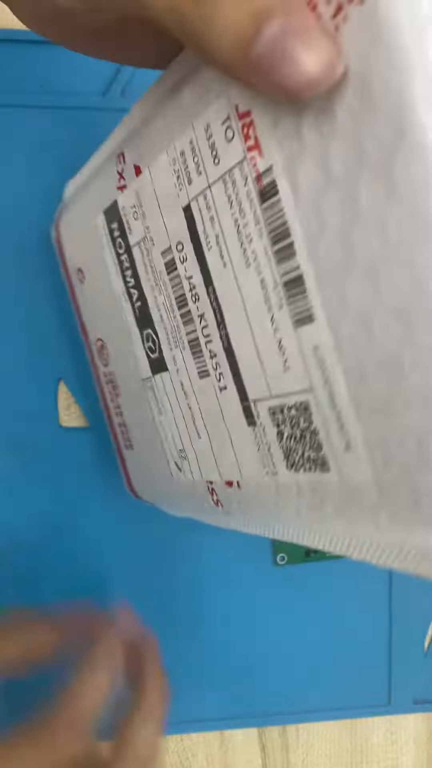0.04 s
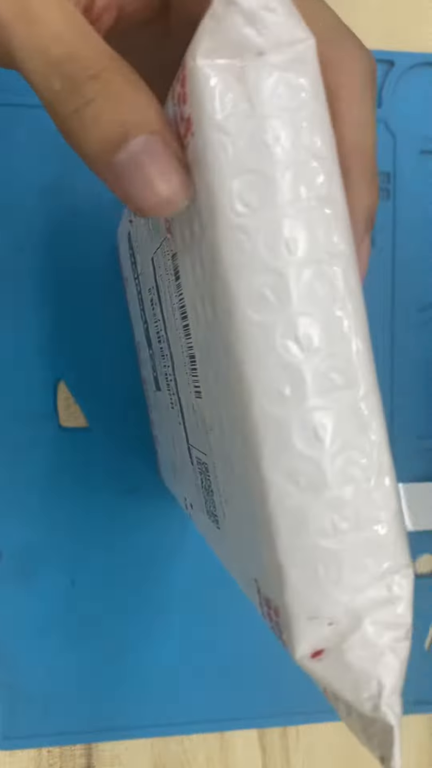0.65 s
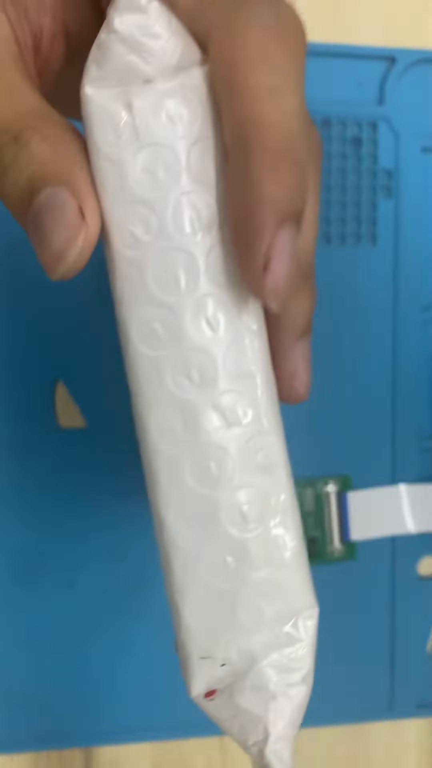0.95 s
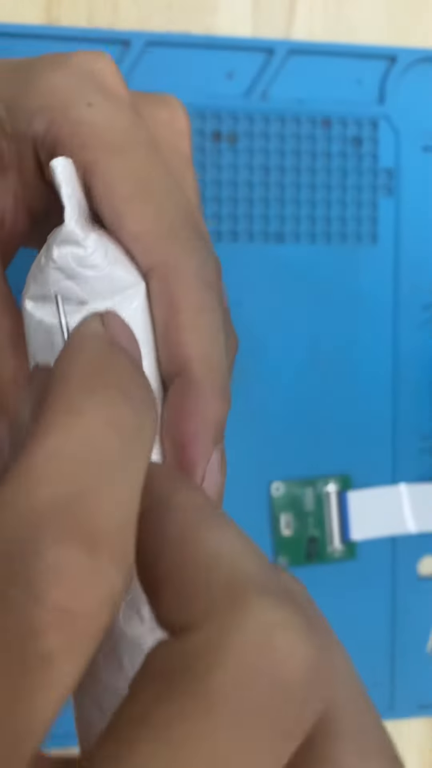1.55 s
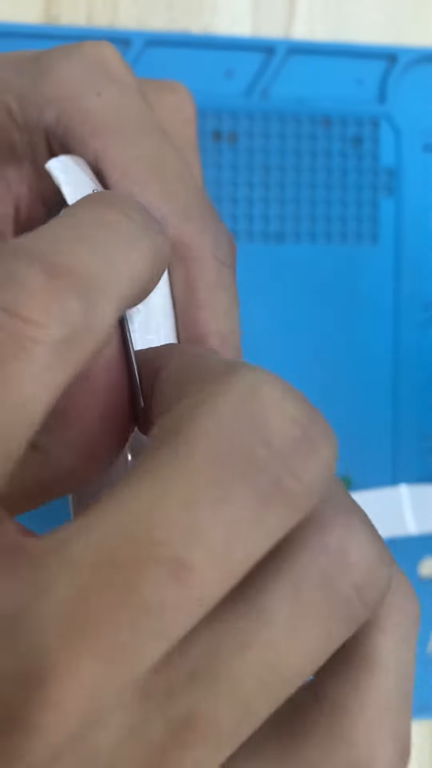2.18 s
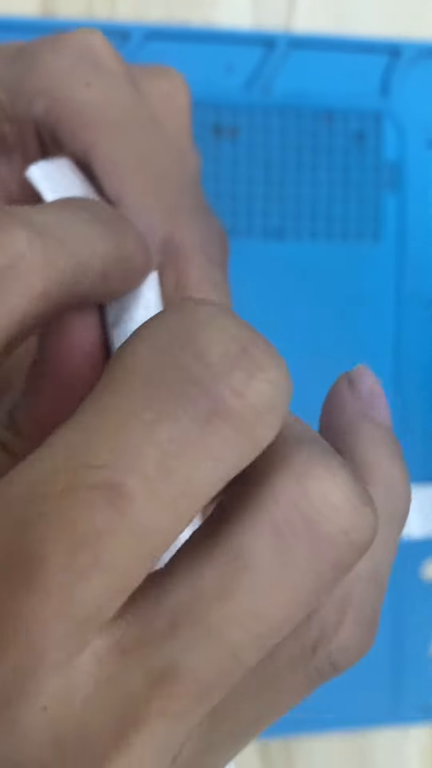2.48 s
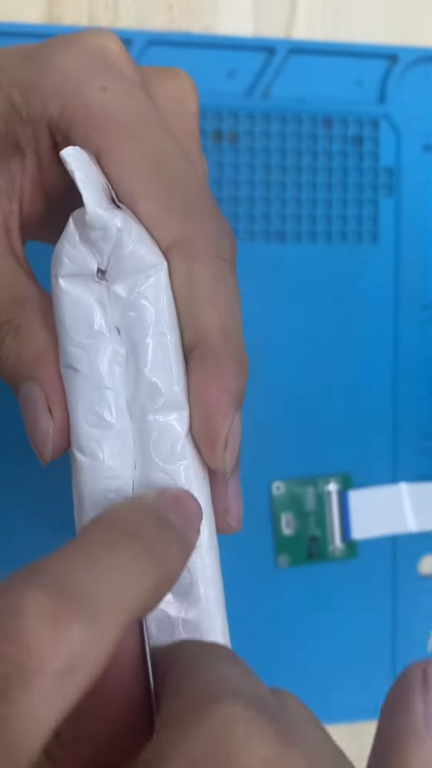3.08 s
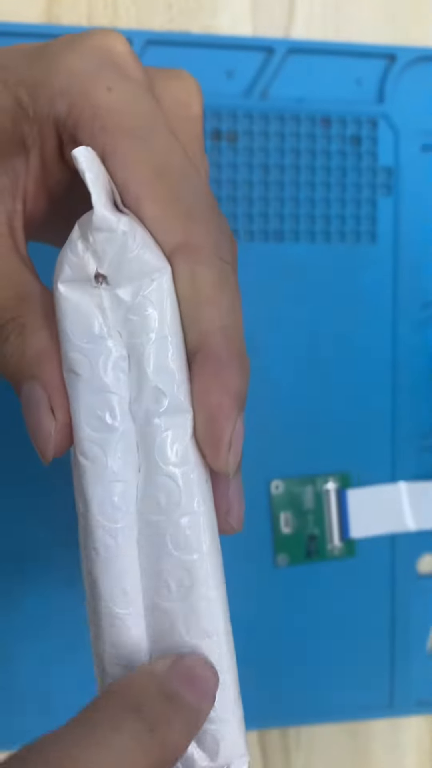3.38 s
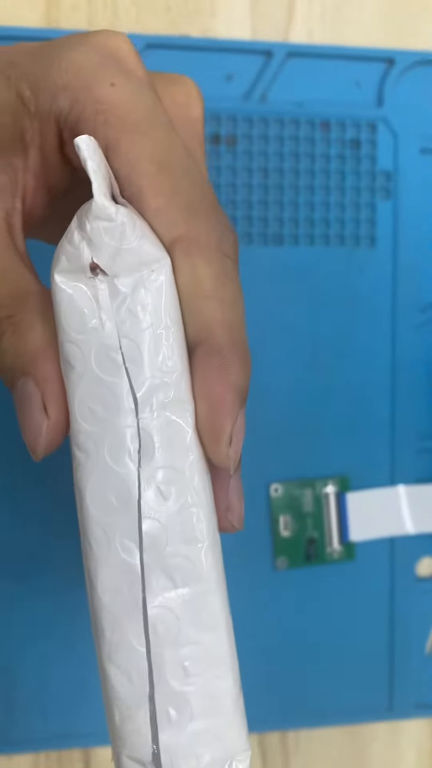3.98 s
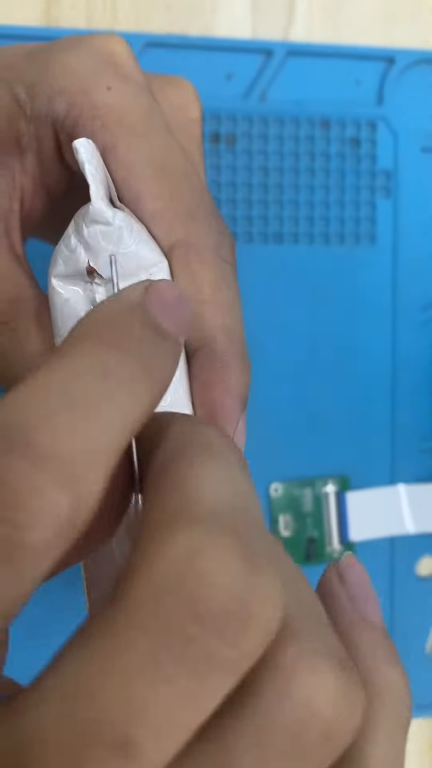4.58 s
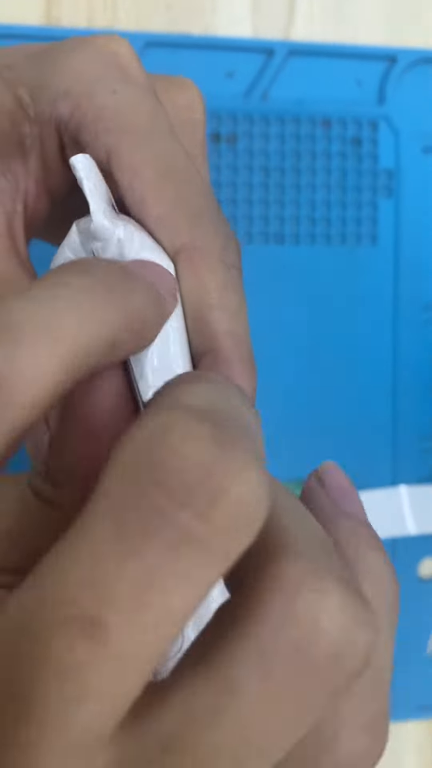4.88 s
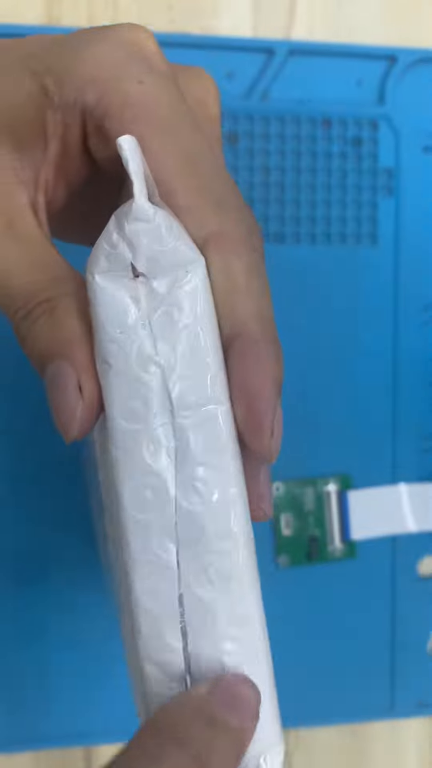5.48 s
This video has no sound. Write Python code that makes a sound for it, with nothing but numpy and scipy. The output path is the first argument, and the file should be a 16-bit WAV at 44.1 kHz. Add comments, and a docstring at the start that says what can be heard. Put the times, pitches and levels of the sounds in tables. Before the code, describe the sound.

A bubble-lined plastic mailer is handled close to a phone microphone, in stereo, in a small room with a steady low hum. From about 0.3 seconds, fingers knock softly on the padding and swish over the film, with a snap and a hollow pop near 1.2 seconds. Light crinkling returns around 2 seconds. From 2.4 to 3.7 seconds a blade slits the edge, rasping in uneven spurts, with dense, sharp crackles, tiny rips and hollow pops as the pouch buckles. A thumb rubs dully near 3 seconds, and a strong pop comes at 3.6. After a short lull, one dull, low bump booms at 4.3 seconds and fades under faint ticks. The second stroke starts at 4.8 seconds with a loud snap and a soft knock, rasps and crackles on, and ends with a sharp, hollow pop at about 5.7 seconds.

```python
"""Slitting a padded mailer

A bubble-lined plastic mailer is gripped over a table and its edge is slit in two strokes of a blade.
Fingers knock on the padding and swish over the film, creases snap, and the blade rasps in spurts as it
sticks and slips. The air-filled pouch pops hollowly as its wall buckles; one dull bump booms between
the strokes. A phone hears it close up, in stereo, in a small room with a low hum."""
import sys
import numpy as np
from scipy import signal
from scipy.fft import rfft, irfft
from scipy.io import wavfile

SR = 44100
rng = np.random.default_rng(int(sys.argv[2]) if len(sys.argv) > 2 else 0)


def wav_out(sig):
    """Save sig, one row per channel (or a flat mono array), as 16-bit PCM at SR to the path in sys.argv[1]."""
    wavfile.write(sys.argv[1], SR, np.round(np.clip(np.atleast_2d(sig).T, -1, 1) * 32767).astype(np.int16))


N = 253134
T = np.arange(N) / SR
TOP_HZ = 16000

# EQ of the room tone: freq_hz, gain_db
ROOM_EQ = [(20, -4), (40, -11), (60, 4.5), (80, 0.5), (100, -4), (160, -2.5), (300, -12), (500, -12.5),
           (900, -19.5), (1400, -27), (2500, -29.5), (8000, -78.5)]
# tones of the hum: pitch_hz, level_db
HUM_TONES = [(60, -50.5), (79, -49)]
# a low drone sets in before the bump and dies away: start_s, length_s, level_db
DRONE_SWELL = [(3.68, 0.67, -39.5)]

# the hand presses into the padding: start_s, length_s, level_db
PRESSES = [(.3, 0.094, -40.5), (1.02, 0.22, -46), (2.12, 0.39, -42.5), (2.93, 0.17, -32.5),
           (3.25, 0.54, -42.5), (4.26, 0.31, -42.5), (4.85, 0.068, -42.5), (5.17, 0.1, -37.5)]
# EQ of the padding's rumble: freq_hz, gain_db
GRIP_EQ = [(30, -21), (70, 5.5), (110, -3), (170, 5), (240, -1.5), (330, -6), (500, -13), (800, -12.5),
           (1600, -56)]
# the palm scuffs the padding: start_s, level_db, fade_s
SCUFFS = [(.308, -46, 0.016), (.508, -39.5, 0.055), (1.032, -32, 0.024), (1.06, -45, 0.18)]
# EQ of a dull scuff: freq_hz, gain_db
SCUFF_EQ = [(170, 9), (350, 11), (780, 10), (1400, -12), (5000, -44)]
# fingers knock on the padding: start_s, pitch_hz, level_db, t60_s, slap_db
KNOCKS = [(0.321, 125, -25.5, 0.17, -14), (.334, 191.5, -24, 0.16, -18), (0.402, 188, -31.5, 0.27, -20),
          (0.508, 220, -34, 0.12, -3), (1.033, 216, -22.5, 0.068, -7), (1.167, 203, -24.5, 0.055, -16),
          (2.14, 228, -26.5, 0.055, -18), (2.961, 143, -26, 0.056, -16), (4.892, 164, -21.5, 0.06, -22)]
# modes of the slack pouch when slapped: pitch_hz, level_db, t60_s
SLAP_MODES = [(330, -1, .06), (495, -3, 0.072), (758, -3.5, 0.053)]

# the louder creases flip: start_s, level_db, facet_hz, ring_db, tilt_db_per_octave
LOUD_SNAPS = [(0.448, -49, 4000, -3, -2), (0.5078, -38.5, 3780, 25, 0), (0.994, -47, 5000, 4, 2),
              (1.0744, -33, 4920, 15, -7.5), (1.1675, -27, 3950, 7, 3), (1.3905, -40.5, 3020, 4, 3.5),
              (1.9742, -41, 5430, 3, 9.5), (2.0322, -33.5, 5300, -2, 3), (2.0457, -34.5, 4660, -2, 2),
              (2.088, -40, 2730, 5, 3), (2.2992, -37, 1930, 0, 6.5), (2.3522, -44.5, 2640, 18, -8),
              (2.4016, -29, 10600, 10, -2.5), (2.4045, -31, 4430, -6, 5), (2.4208, -30.5, 9500, 1, 3),
              (2.6103, -29.5, 1860, 5, 3), (2.6357, -21, 1820, -6, 2), (2.6385, -15, 2000, 6, 2),
              (2.6456, -25.5, 7720, -9, -0.5), (2.6506, -23, 7450, 5, 1), (2.8205, -34, 5660, -10, 7),
              (2.8453, -29.5, 6330, 8, 3), (2.9492, -18.5, 2500, 7, 4), (2.9517, -21, 4900, 16, -2),
              (2.974, -30, 10600, 12, 8), (3.025, -30.5, 4170, -6, 14), (3.0469, -27.5, 7720, -1, 5),
              (3.152, -27, 2240, 9, 1), (3.1555, -27.5, 1880, 7, -2), (3.1643, -21, 2320, 14, 1),
              (3.2526, -29.5, 2620, 10, 4.5), (3.2797, -29.5, 3130, 6, 2), (3.3138, -26.5, 4140, -5, 1),
              (3.327, -38, 5010, 0, -1), (3.3511, -32, 8200, 1, 6), (3.3677, -27.5, 5700, 1, 1),
              (3.393, -28.5, 2640, 2, 2), (3.4129, -29.5, 5370, -1, -3.5), (3.4387, -34, 5500, 13, -2),
              (3.4972, -32.5, 5520, 0, 1), (3.5191, -30.5, 5300, -3, -4), (3.523, -23.5, 5800, 3, 5),
              (3.5444, -23.5, 5270, 0, 3), (3.5717, -34.5, 2380, -3, 5), (3.6299, -20, 3500, 3, -7.5),
              (3.723, -51, 5500, 2, 14), (4.0359, -36, 2630, 15, 0.5), (4.3112, -41.5, 10600, 12, -4),
              (4.4896, -38.5, 2580, 7, 0.5), (4.5377, -36, 6450, -4, 4), (4.8371, -31.5, 6270, 11, 1),
              (4.8871, -15, 2300, 5, -1.5), (4.8884, -18.5, 5130, 13, -7.5), (4.9152, -31, 6170, 7, -1),
              (5.0334, -22.5, 3990, 14, 6), (5.0359, -23.5, 1780, 1, -0.5), (5.0477, -23.5, 6270, 19, 2),
              (5.0688, -24, 3730, 7, 1.0), (5.0767, -26.5, 3480, 6, 3), (5.133, -18.5, 2700, -1, -1.5),
              (5.2336, -30, 2900, 9, 0.5), (5.2606, -28, 2710, -3, 0), (5.2815, -30, 2310, 7, 3),
              (5.3584, -33, 2140, 0, 0), (5.3668, -31.5, 8860, 7, 0.0), (5.5486, -22, 3460, -3, 1.5),
              (5.5706, -22, 3400, 6, 3), (5.582, -24, 5270, 8, 8), (5.5917, -27, 10540, 1, 7),
              (5.6989, -16.5, 3280, 0.5, -2.5)]
# EQ of a snap: freq_hz, gain_db
SNAP_EQ = [(250, -18), (500, -6.5), (900, 2.5), (1400, -0.5), (1650, 5), (2500, 5.5), (3400, 2.5),
           (5500, 7.5), (7400, 10), (9750, -1.5), (13000, -3.5), (15500, -12.5)]
# fingers slide over the film: start_s, length_s, level_db
SLIDES = [(.5, 0.18, -51.5), (1.025, 0.12, -47.5), (1.21, 0.049, -56), (1.378, 0.074, -49.5),
          (1.53, 0.17, -57.5), (1.98, 0.31, -61), (4.16, 0.18, -53), (4.485, 0.16, -57.5)]
# EQ of skin on film: freq_hz, gain_db
SWISH_EQ = [(150, 4.5), (600, 6.5), (900, 4), (1400, 1.5), (2400, 0.5), (3300, 2.5), (5500, 1.5),
            (7300, -3), (9500, -7.5), (12000, -13), (15500, -24)]
# fingers pinch up a flurry of creases: start_s, length_s, level_db
PINCHES = [(1.215, 0.05, -52), (1.375, 0.06, -51), (1.96, 0.19, -52), (2.25, 0.18, -57.5),
           (3.62, 0.17, -57), (4.76, 0.13, -54)]
# a fingertip or the blade skids: centre_s, level_db, half_length_s, tilt_db_per_octave
SKIDS = [(0.665, -39.5, 0.0096, 7), (4.935, -46.5, 0.032, -10)]
# resonances of the taut film: pitch_hz, width_hz, level_db
FILM_RESONANCES = [(1870, 430, -10), (3460, 150, 11), (4030, 300, 6.5), (5150, 650, 0.5), (5900, 260, 4)]
# the film rips a short way: start_s, length_s, level_db
RIPS = [(1.07, 0.0067, -37.5), (2.639, 0.0019, -32), (2.9498, 0.0042, -21), (3.3135, 0.0017, -25),
        (3.5435, 0.0031, -31.5), (5.032, 0.0081, -38), (5.076, 0.0024, -40)]

# the pouch buckles, tuned by the squeeze: start_s, level_db, deep_mode_db, wall_db, pitch_ratio
POPS = [(1.1667, -19, -8.5, -11.5, 1.02), (2.4014, -27, -3, -10, 1.04), (2.6386, -26.5, -8, 7, 1.0),
        (2.9490, -27, -7, 4, 1.02), (3.1640, -29, -2, -1, 1.04), (3.6299, -18.5, 3, -4, 1),
        (4.887, -27.5, 7.5, 9.5, 1.0), (5.6987, -15.5, -2, -5, 1.05)]
# modes of the air in the pouch, deepest first: pitch_hz, level_db, t60_s
AIR_MODES = [(469, -0.5, 0.041), (896, 0.5, 0.019), (1037, -2.5, 0.018)]
# modes of its taut wall: pitch_hz, level_db, t60_s
WALL_MODES = [(1640, -1.5, .02), (2150, -1.5, .013), (2620, 0, .012), (3590, -1.5, .012), (4790, -6, .01)]

# the blade drags steadily in the seam: start_s, length_s, level_db
STROKES = [(2.58, 1.142, -52), (4.82, 0.86, -52.5)]
# the blade lurches on as the seam gives: start_s, length_s, level_db
LURCHES = [(2.388, 0.03, -43.5), (2.592, 0.036, -40.5), (2.615, 0.059, -36.5), (2.775, 0.07, -41.5),
           (2.937, 0.074, -40), (3.014, 0.36, -41), (3.293, 0.037, -39), (3.4, 0.022, -35.5),
           (3.48, 0.071, -37), (3.598, 0.061, -44.5), (4.989, 0.097, -37.5), (5.095, 0.2, -44),
           (5.328, 0.032, -39), (5.399, 0.071, -41), (5.538, 0.059, -36.5), (5.678, 0.045, -45)]
# EQ of the blade's rasp and the film's crinkle: freq_hz, gain_db
RASP_EQ = [(150, 15.5), (500, 2), (900, 5), (1350, -1.5), (1700, 5.5), (1900, 2), (2550, 7), (3200, 3.5),
           (4200, 1.5), (5600, 2.5), (7300, 3), (9500, -6.5), (12000, -7.5), (15500, -17)]
# the thumb judders over the padding in the first stroke: start_s, length_s, level_db
RUBS = [(3.03, .11, -37.5), (3.19, 0.026, -46)]
# resonances of the padding: pitch_hz, width_hz, level_db
PADDING_RESONANCES = [(154, 18, 1.5), (195, 15, -9), (234, 13.7, 2.5), (286, 43, -9)]
# modes of the dull bump: pitch_hz, level_db, t60_s
BUMP_MODES = [(78.1, -19, 0.77), (123, -15.5, 0.08), (64.5, -21, 0.15), (187.4, -38, 0.55),
              (272, -52, 0.099)]

# phase of the left microphone port against the right: freq_hz, lead_rad
PORT_PHASE = [(0, 0.5), (850, -1.3), (1250, -1.25), (2000, -0.14), (2580, 1.0), (4300, 1.03), (5050, 0),
              (6400, 2.5), (8100, 4), (9730, 6), (12700, 8.5), (16000, 12.5)]
# level of the left port against the right: freq_hz, balance_db
PORT_BALANCE = [(60, 2), (520, 3), (1000, -6), (1850, -2), (2500, -2.5), (4400, -2.5), (5400, 1),
                (15000, -0.5)]


def undb(db):
    """Decibels to gain."""
    return 10 ** (np.asarray(db) / 20)


def unit(x):
    """Scale to rms 1."""
    return x / np.sqrt(np.mean(x ** 2))


def on_octaves(hz, points):
    """Read a curve of (freq_hz, value) points on a log-frequency axis."""
    point_hz, value = np.transpose(points)
    return np.interp(np.log(hz + 1), np.log(point_hz), value)


def eq(x, points, tilt_db=0):
    """Apply an EQ curve, rolled off below its first point and tilted per octave above 1800 Hz."""
    hz = np.fft.rfftfreq(x.shape[-1], 1 / SR)
    db = on_octaves(hz, points) + tilt_db * np.log2(np.maximum(hz, 1800) / 1800)
    low_cut = np.minimum(hz / points[0][0], 1) ** 2
    return irfft(rfft(x) * undb(db) * low_cut, x.shape[-1])


def wander(rate_hz):
    """Smooth random modulation at rms 1."""
    knots = rng.standard_normal(N // 20)
    return unit(np.interp(T * rate_hz, np.arange(len(knots)), knots))


def add(track, start_s, sound):
    """Mix a sound into a track."""
    i = max(int(start_s * SR), 0)
    track[i:i + len(sound)] += sound[:N - i]


def gestures(rows, attack_s, release_s):
    """Envelope of gestures that each rise, hold and fade; overlaps add in power."""
    power = np.zeros(N)
    for start_s, length_s, db in rows:
        rise = np.clip((T - start_s) / attack_s, 0, 1)
        fade = np.exp(-np.maximum(T - start_s - length_s, 0) / release_s)
        power += (undb(db) * rise * fade) ** 2
    return np.sqrt(power)


def resonate(x, hz, width_hz, passes=1):
    """One resonance, gain 1 at its centre; more passes steepen its skirts."""
    for _ in range(passes):
        x = signal.lfilter(*signal.iirpeak(hz, hz / width_hz, fs=SR), x)
    return x


def ring(modes, rise_s):
    """Damped modes after a push that takes rise_s."""
    t = T[:SR]
    waves = sum(undb(db - 60 * t / t60) * np.sin(2 * np.pi * hz * t) for hz, db, t60 in modes)
    return waves * (1 - np.exp(-t / rise_s))


def friction(points, catch_db):
    """Sliding contact catches and slips a few hundred times a second."""
    grainy = rng.standard_normal(N) * undb(catch_db * (wander(400) + .5 * wander(60)))
    return unit(eq(grainy, points))


def crinkle(per_s, spread_db, tilt_db, tail_s=0.001):
    """Many tiny creases give way, most of them faint, each with a short flutter."""
    fires = rng.random(N) < per_s / SR
    size = np.minimum(rng.exponential(size=N), 3)
    envelope = signal.lfilter([1], [1, -np.exp(-1 / (tail_s * SR))], fires * undb(spread_db * size))
    return unit(eq(envelope * rng.standard_normal(N), RASP_EQ, tilt_db))


def hum(hz, waver_db=2.5):
    """A low tone that wavers in level and phase."""
    level = np.sqrt(2) * undb(waver_db * wander(4.67))
    return level * np.sin(2 * np.pi * hz * T + 1.13 * wander(4.6))


def room_tone(rumble_db=-43.5):
    """The bed: a steady rumble, near mono in the bass, with a hum and a passing, uneven drone."""
    mid = unit(eq(rng.standard_normal(N), ROOM_EQ))
    side = unit(eq(rng.standard_normal(N), ROOM_EQ))
    side = eq(side, [(40, -23), (250, -19), (700, 1), (4000, -6.5)])
    drone = unit(resonate(rng.standard_normal(N), hz=109, width_hz=19.6, passes=2))
    drone *= gestures(DRONE_SWELL, attack_s=0.056, release_s=0.81)
    hums = sum(undb(db) * hum(hz) for hz, db in HUM_TONES)
    return undb(rumble_db) * np.array([mid + side, mid - side]) + hums + drone


def grip_rumble(trim_db=-3, rest_db=-48):
    """The padding rumbles under a hand that presses in and is never quite still."""
    pressing = np.hypot(gestures(PRESSES, attack_s=0.015, release_s=0.34), undb(rest_db))
    return undb(trim_db) * pressing * unit(eq(rng.standard_normal(N), GRIP_EQ))


def palm_scuffs(rise_s=0.00076):
    """The palm brushes the padding in dull puffs of noise."""
    t = T[:SR]
    out = np.zeros(N)
    for start_s, db, fade_s in SCUFFS:
        scuff = unit(eq(rng.standard_normal(SR), SCUFF_EQ))
        envelope = np.exp(-t / fade_s) * (1 - np.exp(-t / rise_s))
        add(out, start_s, undb(db) * envelope * scuff)
    return out


def finger_knocks():
    """A finger lands: a soft thud from the padding and a hollow slap from the slack pouch."""
    out = np.zeros(N)
    for start_s, hz, db, t60, slap_db in KNOCKS:
        thud = ring([(hz, db, t60)], rise_s=0.0035)
        slap = undb(db + slap_db) * ring(SLAP_MODES, rise_s=0.00091)
        add(out, start_s, thud + slap)
    return out


def snaps(rows, crack_s=0.00002, flutter_s=0.0013, flutter_db=-1.5, facet_q=6.5):
    """A crease flips with a dry crack; its facet rings and the film flutters for a few milliseconds."""
    lead_s, body_s = 0.004, 0.0027
    t = T[:1024] - lead_s
    crack = unit(np.exp(-np.abs(t) / crack_s))
    flutter_envelope = np.clip(t / 0.00043, 0, 1) * np.exp(-np.abs(t) / flutter_s)
    out = np.zeros(N)
    for start_s, db, facet_hz, ring_db, tilt_db in rows:
        flutter = unit(flutter_envelope * rng.choice([-1, 1], len(t)))
        burst = eq(crack + undb(flutter_db) * flutter, SNAP_EQ, tilt_db)
        burst += undb(ring_db) * resonate(burst, facet_hz, facet_hz / facet_q)
        burst *= np.sqrt(body_s * SR / np.sum(burst ** 2))  # the energy of rms 1 held for body_s
        add(out, start_s - lead_s, undb(db) * burst)
    return out


def disperse(x, spread_s=0.0003, corner_hz=3000):
    """The springy film smears each crack over a fraction of a millisecond, lows first."""
    hz = np.fft.rfftfreq(N, 1 / SR)
    phase = 2 * np.pi * spread_s * corner_hz * np.arctan(hz / corner_hz)
    return irfft(rfft(x) * np.exp(1j * phase), N)


def fingers_on_film(swish_db=-1, guide_db=-3, rest_swish_db=-61.5, rest_crinkle_db=-75):
    """Skin swishes over the film and presses bright ticks out of it, also while guiding the blade."""
    sliding = np.hypot(gestures(SLIDES, attack_s=0.0087, release_s=0.057), undb(rest_swish_db))
    swish = undb(swish_db) * sliding * friction(SWISH_EQ, catch_db=2)
    attack_s, release_s = 0.0068, 0.032
    pinching = gestures(PINCHES, attack_s, release_s)
    guiding = undb(guide_db) * gestures(STROKES, attack_s, release_s)
    pressure = np.hypot(pinching, guiding) + undb(rest_crinkle_db)
    return swish + pressure * crinkle(per_s=200, spread_db=5, tilt_db=3, tail_s=0.0005)


def skids():
    """Short, squeaky scrapes: friction in the narrow resonances of the film."""
    drag = rng.standard_normal(N)
    bands = [(hz, undb(db) * resonate(drag, hz, width)) for hz, width, db in FILM_RESONANCES]
    out = np.zeros(N)
    for centre_s, db, half_length_s, tilt_db in SKIDS:
        squeak = unit(sum(undb(tilt_db * np.log2(hz)) * band for hz, band in bands))
        swell = np.exp(-.5 * ((T - centre_s) / half_length_s) ** 2)
        out += undb(db) * swell * squeak
    return out


def rips():
    """The film tears in short, ragged runs of tiny cracks."""
    cracks = crinkle(per_s=3000, spread_db=3.5, tilt_db=1.5)
    return gestures(RIPS, attack_s=0.00022, release_s=0.0025) * cracks


def pouch_pops():
    """The wall buckles with a clack and rings the air inside."""
    out = np.zeros(N)
    for start_s, db, deep_db, wall_db, pitch_ratio in POPS:
        tuning = np.array([pitch_ratio, 1, 1])
        air = tuning * AIR_MODES
        # a wide dent pushes the whole air cushion, a small one only the higher modes
        deep = undb(deep_db) * ring(air[:1], rise_s=0.0012)
        hollow = ring(air[1:], rise_s=0.00068)
        clack = undb(wall_db) * ring(tuning * WALL_MODES, rise_s=0.0001)
        add(out, start_s, undb(db) * (deep + hollow + clack))
    return out


def slitting(effort, rasp_db=-3.5, tear_db=-4):
    """The blade sticks and slips, rasping in spurts while the seam parts in tiny, bright tears."""
    spurts = undb(1.8 * wander(110))
    rasp = unit(spurts * friction(RASP_EQ, catch_db=2.5))
    tears = unit(spurts * crinkle(per_s=550, spread_db=4.5, tilt_db=2, tail_s=0.0003))
    return effort * (undb(rasp_db) * rasp + undb(tear_db) * tears)


def blade_snaps(effort, chances=290, gate_db=-54, trim_db=-0.5, scatter_db=4, ring_db=5, tilt_db=3):
    """A close run of small, bright snaps, as strong as the blade is working."""
    middle_hz, spread_octaves = 5700, 0.31
    rows = []
    for when, size, facet in rng.random((chances, 3)):
        i = int(when * N)
        if effort[i] > undb(gate_db):
            db = 20 * np.log10(effort[i]) + trim_db + scatter_db * (2 * size - 1)
            facet_hz = middle_hz * 2 ** (spread_octaves * (2 * facet - 1))
            rows.append((T[i], db, facet_hz, ring_db, tilt_db))
    return snaps(rows, flutter_db=6)


def thumb_rubs(widen=1.4):
    """The dragging thumb sets the padding groaning in its low resonances."""
    drag = rng.standard_normal(N)
    groan = sum(undb(db) * resonate(drag, hz, widen * width, passes=2)
                for hz, width, db in PADDING_RESONANCES)
    return gestures(RUBS, attack_s=0.018, release_s=0.029) * unit(groan)


def bump(start_s=4.291, low_cut_hz=42):
    """A soft, heavy bump whose low modes boom on."""
    out = np.zeros(N)
    add(out, start_s, ring(BUMP_MODES, rise_s=0.0022))
    return signal.sosfilt(signal.butter(2, low_cut_hz, "high", fs=SR, output="sos"), out)


def mic_ports(x):
    """Two microphone ports hear the close sound with different phase and shading."""
    hz = np.fft.rfftfreq(N, 1 / SR)
    lead_rad = np.interp(hz, *np.transpose(PORT_PHASE))
    left = undb(on_octaves(hz, PORT_BALANCE) / 2) * np.exp(.5j * lead_rad)
    return irfft(rfft(x) * np.array([left, 1 / left]), N)


def reflections(x, t60_s, send_db, predelay_s, mid_db, wide_above_hz=450):
    """A decaying spray of echoes, mono in the bass and wide above it."""
    t = T[:SR // 2]
    decay = np.exp(-np.log(1000) * t / t60_s) * (t > predelay_s)
    mid, side = rng.standard_normal((2, len(t))) * decay
    side = signal.sosfilt(signal.butter(2, wide_above_hz, "high", fs=SR, output="sos"), side)
    tail = undb(mid_db) * mid + np.array([side, -side])
    tail /= np.sqrt(np.sum(tail[0] ** 2))
    tail = eq(tail, [(100, 4), (600, 10.5), (1500, 5), (5000, 4.5), (15000, -12)])
    return undb(send_db) * signal.fftconvolve(x[None], tail, axes=1)[:, :N]


def scene():
    """The mailer up close, with a quick bounce off hands and table and a faint room tail."""
    effort = gestures(STROKES + LURCHES, attack_s=0.012, release_s=0.019)
    cracks = disperse(snaps(LOUD_SNAPS) + blade_snaps(effort))
    film = cracks + rips() + slitting(effort) + fingers_on_film() + skids()
    padding = grip_rumble() + palm_scuffs() + finger_knocks() + pouch_pops() + thumb_rubs()
    close = film + padding + bump()
    table = reflections(close, t60_s=0.0084, send_db=-17.5, predelay_s=0.00048, mid_db=-7)
    walls = reflections(close, t60_s=0.52, send_db=-25, predelay_s=0.0035, mid_db=3)
    return mic_ports(close) + table + walls + room_tone()


def record(dry):
    """The phone cuts the top with a steep low-pass."""
    return signal.sosfilt(signal.ellip(10, .2, 90, TOP_HZ, fs=SR, output="sos"), dry)


dry = scene()
out = record(dry)
wav_out(out)
```